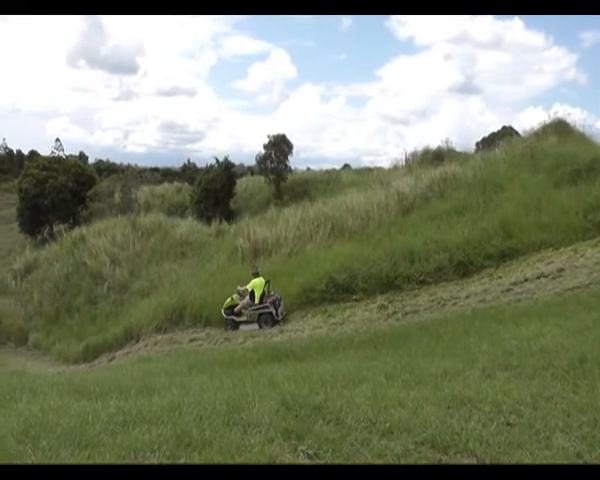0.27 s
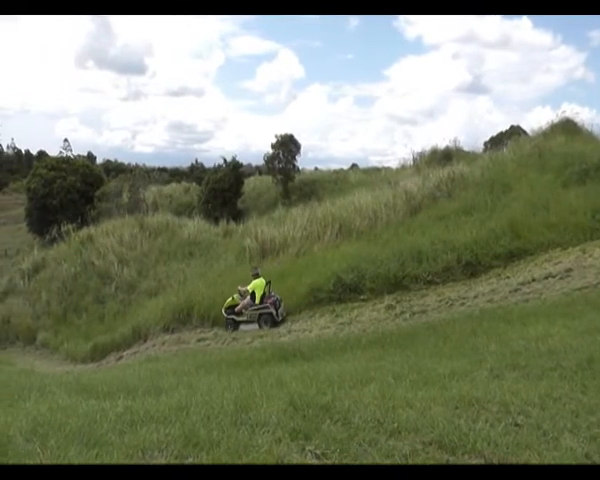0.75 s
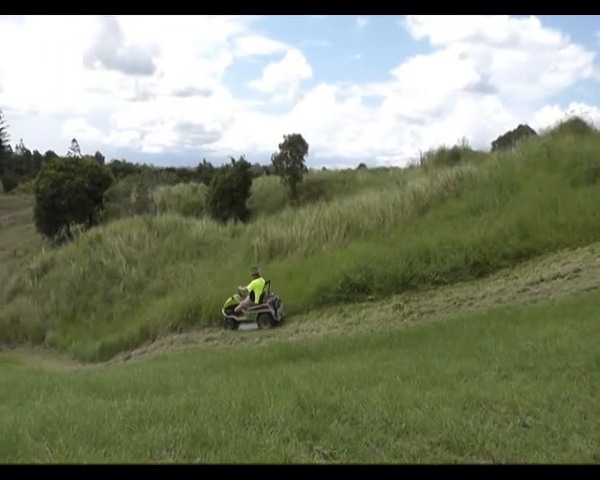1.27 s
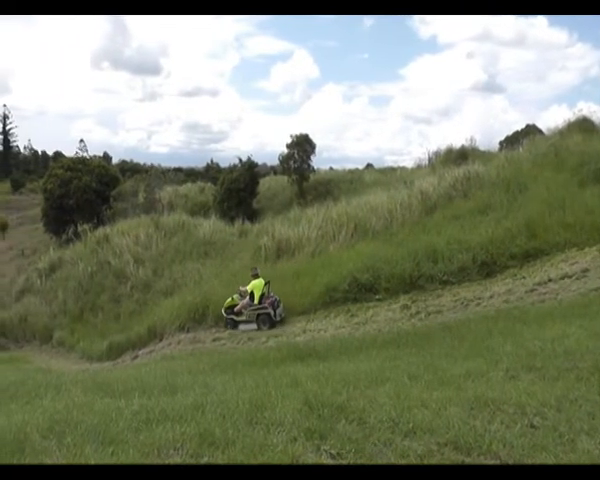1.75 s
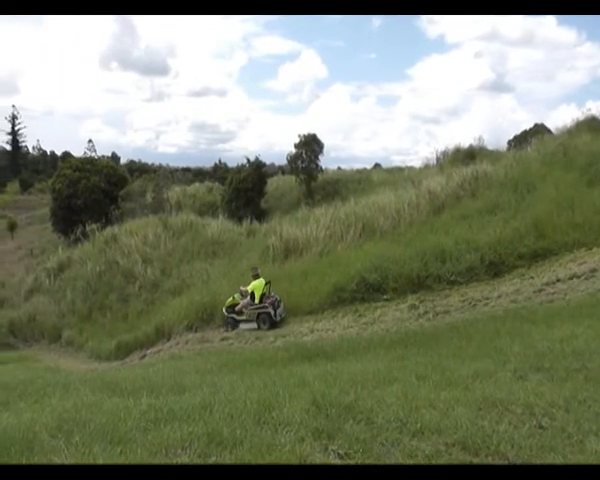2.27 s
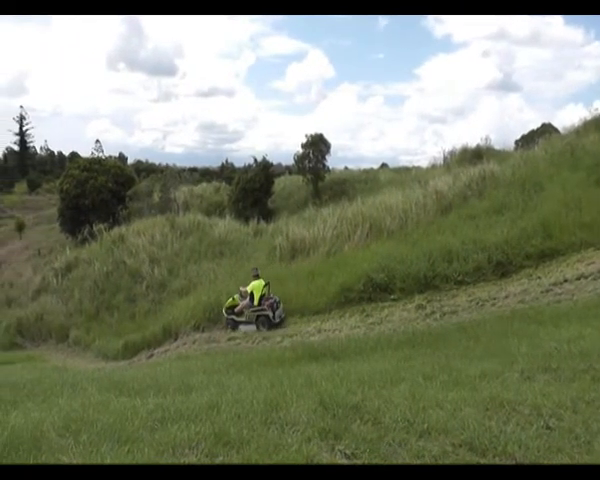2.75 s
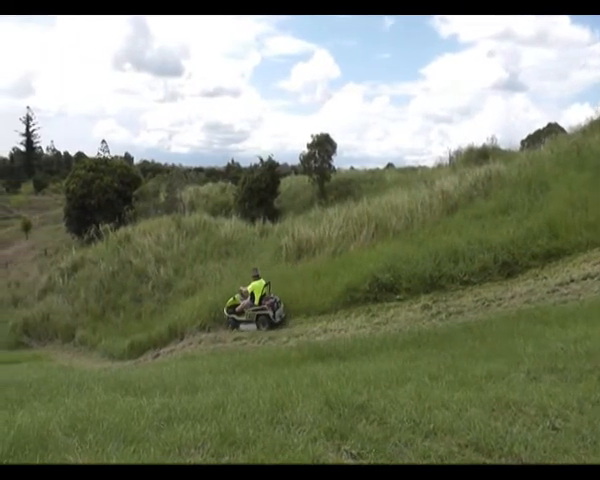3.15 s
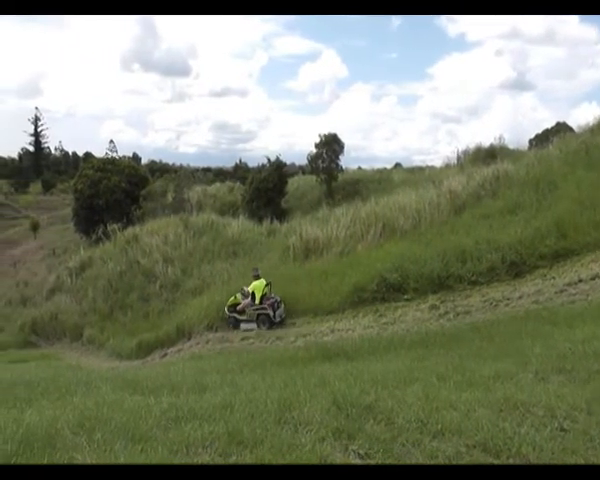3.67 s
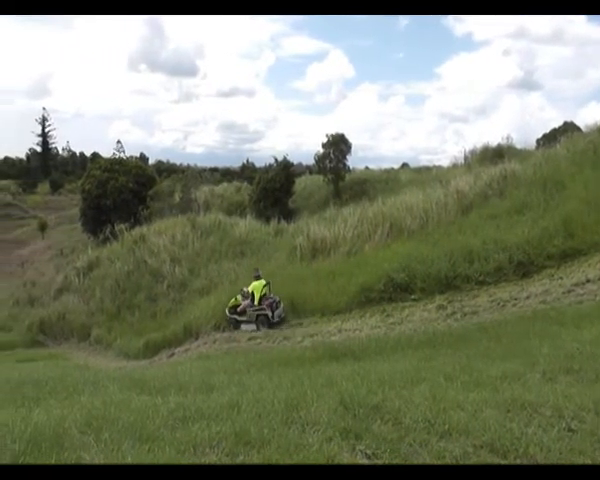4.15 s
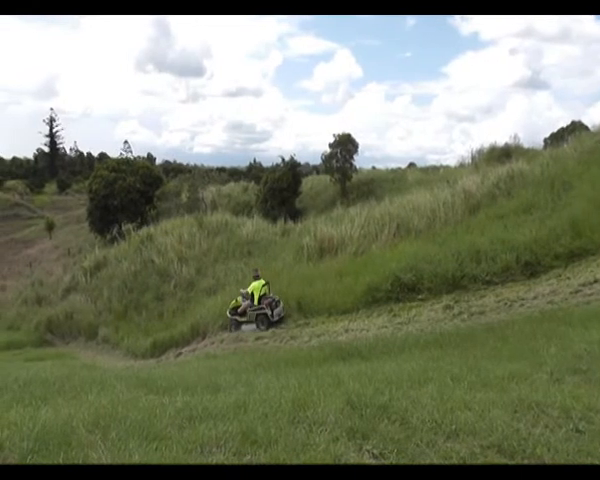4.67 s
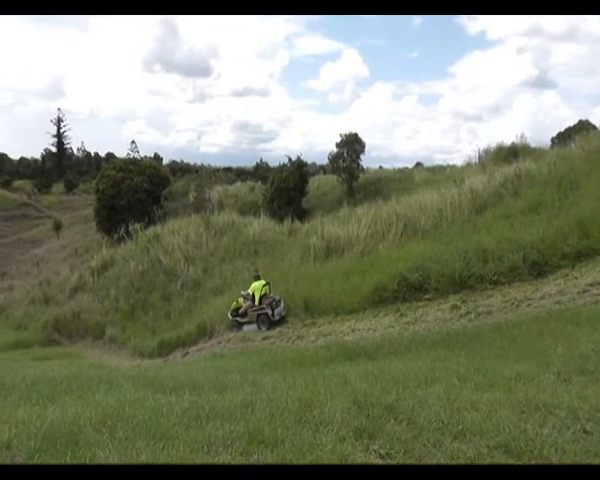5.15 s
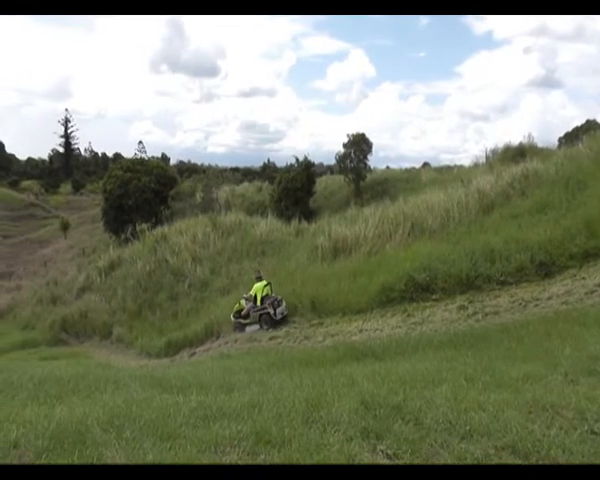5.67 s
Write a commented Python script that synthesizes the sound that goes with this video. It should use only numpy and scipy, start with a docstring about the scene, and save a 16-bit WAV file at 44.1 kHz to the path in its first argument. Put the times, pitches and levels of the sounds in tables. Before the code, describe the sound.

A ride-on mower's twin-cylinder petrol engine drones in the distance, its blades swishing through tall grass, bogging into a rougher bark near the end.

```python
"""A two-cylinder petrol engine drones from afar: a ride-on mower works through tall grass on an open hillside.
Sums of engine orders make the drone, and higher orders and pipe hiss the bark when thick grass bogs it down.
Orders of the blade passes thump in the deck, and throbbing noise is the slash of the grass at every pass.
Filtered noise makes the clatter, the roar and the breeze rumbling on the microphone; gusts and stalk
cracks come and go, and near the end a clump of grass surges through the deck."""
import sys
import numpy as np
from scipy import signal
from scipy.io import wavfile
from scipy.ndimage import uniform_filter1d

SR = 44100
rng = np.random.default_rng(int(sys.argv[2]) if len(sys.argv) > 2 else 0)


def store_wav(level_fs):
    """Save 16-bit WAV to argv[1]."""
    pcm = np.round(np.clip(np.atleast_2d(level_fs), -1, 1) * 32767)
    wavfile.write(sys.argv[1], SR, pcm.T.astype(np.int16))


def volts(x):
    """Linear amplitude factor 10**(x/20) for a level x in dB, scalar or array-like."""
    e = np.asarray(x, float) / 20
    return 10 ** e


N = 261072  # samples

FIRST_PASS = .46        # blade's place in its cycle of passing, in parts of that cycle
SECOND_CYLINDER = .375  # second firing after the first, in parts of a firing cycle
LEFT_RIGHT = np.array([[1], [-1]])


def rms_one(x):
    """Scale to unit rms."""
    return x / np.sqrt(np.mean(x ** 2) + 1e-20)


def in_time(rows):
    """Draw the columns of a table as curves over the samples."""
    seconds, *columns = np.transpose(rows)
    return [np.interp(np.arange(N) / SR, seconds, column) for column in columns]


def at_hz(points, hz):
    """Read a spectrum on a log-frequency axis."""
    point_hz, value = np.array(points).T[:2]
    return np.interp(np.log(hz), np.log(np.maximum(point_hz, 1)), value)


def drift(rate_hz):
    """Slow chance of spread 1: coarse noise through a double one-pole low-pass."""
    coarse = 40  # samples per coarse step
    pole = np.exp(-2 * np.pi * coarse * rate_hz / SR)
    noise = rng.standard_normal(N // coarse + 2002)
    slow = signal.lfilter([1], [1, -2 * pole, pole * pole], noise)[2000:]  # settled part only
    return np.interp(np.arange(N) / coarse, np.arange(len(slow)), rms_one(slow))


def turns(per_s):
    """Cycles completed since the start: the running sum of the rate."""
    return np.cumsum(per_s) / SR


def hiss_pairs():
    """White noise for bands(): two pairs, each a mid and a side signal."""
    return rng.standard_normal((2, 2, N))


# Stereo width over the spectrum. Each row: frequency in Hz, left-right likeness (1 = the same).
LIKENESS = [(60, 0.4), (110, 0.97), (200, 0.77), (370, 0.9), (690, 0.83), (1270, 0.96), (2330, 0.88),
            (4280, 0.88), (7880, 0.93), (14500, 0.65)]
# Stereo tilt over the spectrum. Each row: frequency in Hz, left minus right in dB.
LEFT_LEAD = [(60, -1), (700, 0.7), (1200, 3), (2300, 0), (4300, 0.5), (8000, 0), (14000, 6.5)]


def bands(spectrum, source, patchy_db, alike=1.0, flicker_hz=14.0):
    """Third-octave bands of noise, each with its own level, flicker and stereo likeness; rms 1 overall."""
    low_hz, high_hz = spectrum[0][0], spectrum[-1][0]
    edges = np.geomspace(low_hz, high_hz, int(3 * np.log2(high_hz / low_hz)) + 1)
    out = 0
    for k, (low, high) in enumerate(zip(edges, edges[1:])):
        sos = signal.butter(2, [low, high], "band", fs=SR, output="sos")
        mid, side = signal.sosfilt(sos, source[k % 2])  # neighbouring bands use different noise
        hz = np.sqrt(low * high)
        likeness = np.clip(alike * at_hz(LIKENESS, hz), 0, 1)
        level_db = at_hz(spectrum, hz) + patchy_db * drift(flicker_hz)
        gain = volts(level_db + at_hz(LEFT_LEAD, hz) / 2 * LEFT_RIGHT)
        out = out + gain * (np.sqrt(1 + likeness) * mid + np.sqrt(1 - likeness) * side * LEFT_RIGHT)
    return rms_one(out)


def order(phase, wobble_db, jitter, rate_hz=2.1):
    """One order of a rotation (phase in turns), wavering in level and phase as the air path shimmers."""
    level = np.sqrt(2) * volts(wobble_db * drift(rate_hz))
    return level * np.cos(2 * np.pi * phase + jitter * drift(4.6))  # jitter in radians


def puffs(phase, fall):
    """Two unevenly spaced gas puffs a cycle, each dying away; fall in parts of a cycle."""
    return sum(np.exp(-((phase - start) % 1) / fall) for start in (-.04, SECOND_CYLINDER - .06))


def burst(phase, rise, spread):
    """A swell each cycle, quick up and slower down, every cycle with its own strength."""
    part, count = phase % 1, np.floor(phase).astype(int) + 1
    swell = -np.cos(2 * np.pi * np.interp(part, [0, rise, 1], [0, .5, 1]))
    swell = swell - 2.0 * np.maximum(-swell, 0) ** 2  # the gaps run deeper than the crests run high
    strength = rng.standard_normal(count.max() + 1)[count]
    return swell + spread * uniform_filter1d(strength, size=120)


# The engine's speed. Each row: time in seconds, firing cycles per second.
ENGINE = [(0.0, 27.02), (0.4, 26.95), (1.0, 27.21), (1.6, 27.57), (2.2, 27.17), (2.7, 26.87), (3.2, 27.07),
          (3.65, 26.6), (4.1, 26.98), (4.55, 26.0), (4.85, 25.93), (5.1, 24.5), (5.3, 25.43), (5.55, 26.98),
          (5.75, 25.76), (5.92, 24.81)]
# The belt drive, slipping in thick grass. Each row: time in seconds, blade passes per firing cycle.
BELT = [(0.0, 1.8235), (0.6, 1.8401), (4.05, 1.8405), (4.8, 1.7956), (5.92, 1.8243)]


def engine_and_blade():
    """Phases in turns: the engine's firing cycle, and the blade passes that the belt drives from it."""
    cycles_per_s, = in_time(ENGINE)
    passes_per_cycle, = in_time(BELT)
    return turns(cycles_per_s), turns(cycles_per_s * passes_per_cycle)


# Exhaust orders. Each row: multiple of the firing cycle, level within the drone in dB,
# level within the bark in dB.
EXHAUST = [(2, -20, -22), (3, -15.5, -25), (4, -25, -23), (5, -1, -34), (6, -2, -3.5), (7, -11.5, -10),
           (8, -8, 0.5), (9, -12, -13), (10, -18, 4), (11, -24, -4.5), (13, -18, -14.5), (16, -19.5, -25),
           (20, -15, -16.5)]


def exhaust(phase, drone_db, bark_db):
    """Two uneven firings a cycle: the muffler passes a low drone, under load higher orders break through."""
    out = 0
    for k, drone, bark in EXHAUST:
        both_cylinders = 1 + np.exp(-2j * np.pi * k * SECOND_CYLINDER)
        twin = np.angle(both_cylinders) / (2 * np.pi)  # phase of their sum, in turns
        drone_phase = k * (phase - .02) + twin - .12
        bark_phase = k * (phase + SECOND_CYLINDER) + twin + .4
        out = out + volts(drone_db + drone) * order(drone_phase, wobble_db=1.2, jitter=.2)
        out = out + volts(bark_db + bark) * order(bark_phase, wobble_db=2.2, jitter=.2, rate_hz=3)
    return out


# Deck thump orders. Each row: multiple of the blade pass rate, level within the thump in dB.
THUMP = [(2, -15), (3, -1.5), (4, 2), (5, -2.5), (6, -9.5), (7, -8), (8, -10.5), (10, -15.5)]


def deck(phase, thump_db):
    """Each blade pass pumps air and grass through the housing as one soft thump."""
    place = phase - FIRST_PASS - .26
    return volts(thump_db) * sum(volts(db) * order(k * place, wobble_db=2.5, jitter=0.86) for k, db in THUMP)


# The cut over time. Each row: time in seconds, grass slash level in dB, depth of the throb at each
# pass in dB for a swing of 1.
CUT = [(0.0, -29.5, 4), (0.33, -30, 1.5), (0.55, -33.5, 1.5), (1.5, -30, 3), (2.3, -31.5, 3.5),
       (2.6, -28.5, 1), (3.25, -31.5, 5), (3.7, -29.5, 4.5), (4.0, -32, 5.5), (4.2, -30.5, 0),
       (4.85, -30.5, 4), (5.36, -37, 1.5), (5.77, -30.5, 1.5), (5.92, -38.5, 3)]
# Colour of the slash. Each row: frequency in Hz, relative level in dB per Hz.
SLASH = [(1760, -16), (3000, -6), (3970, -10), (4210, -8.5), (5100, -4.5), (6880, -8), (7570, 0),
         (10200, -4), (11800, -7), (13800, -10)]


def slash(phase):
    """A swish of hiss and stalk snaps at every pass of the blade, throbbing with the cut."""
    level_db, depth_db = in_time(CUT)
    throb = volts(depth_db * burst(phase - FIRST_PASS + .05 * drift(25), rise=.33, spread=.22))
    throb = throb / np.sqrt(uniform_filter1d(throb ** 2, size=8820))  # even level over 0.2 s
    unevenness = np.minimum(rng.exponential(1, (2, 1, N)), 6)  # stalks break unevenly
    snaps = volts(2.8 * unevenness + 2.0 * drift(150))
    return volts(level_db) * bands(SLASH, hiss_pairs() * throb * snaps, patchy_db=1.5, flicker_hz=40.0)


# Colour of the clatter. Each row: frequency in Hz, relative level in dB per Hz.
CLATTER = [(380, -37), (650, -5), (687, -35), (776, -24), (1030, -11), (1190, -7), (1290, -1), (1420, -7.5),
           (2300, -8), (3630, -8), (6000, -18), (7800, -29), (13200, -120)]
# Whine of fan and gears. Each row: multiple of the firing cycle, level against the clatter in dB.
WHINE = [(36, -24), (39, -23), (40, -20), (42, -24), (43, -20), (44, -19), (45, -22)]


def clatter(phase, level_db):
    """Valves, belt and cooling fan: noise swelling a little at each firing, with a faint high-order whine."""
    beat = (1 + .5 * puffs(phase, fall=0.18)) * volts(1.0 * drift(28))
    whine = sum(volts(db) * order(k * phase + rng.random(), wobble_db=2.5, jitter=.3) for k, db in WHINE)
    return volts(level_db) * (bands(CLATTER, hiss_pairs() * beat, patchy_db=0.79) + whine)


# Colour of the hiss at the pipe. Each row: frequency in Hz, relative level in dB per Hz.
PIPE_HISS = [(1200, -21), (1800, -10), (2700, 9), (3800, -16), (5500, 3.5), (7000, 0), (10000, -1),
             (13800, -6)]


def tailpipe(phase, bark_db):
    """Gas hisses out of the pipe at each firing, harder as the engine barks."""
    gas = uniform_filter1d(puffs(phase, fall=0.2), size=60) * volts(2.0 * drift(36))
    return volts(1.21 * bark_db + 0.5) * bands(PIPE_HISS, hiss_pairs() * gas, patchy_db=1.5)


# Colour of the low roar. Each row: frequency in Hz, relative level in dB per Hz.
ROAR = [(90, -5), (130, -32), (180, 11), (260, 1.5), (340, -1.5), (550, 3), (700, -13), (900, -5.5)]


def roar(phase, clatter_db, thump_db, drone_db):
    """Low noise that heaves with the firings and follows part of the swing of clatter, thump and drone."""
    level_db = -31.5
    for curve_db, share in ((clatter_db, .3), (thump_db, .33), (drone_db, .23)):
        level_db = level_db + share * (curve_db - curve_db.mean())
    swell = 1 + 0.82 * puffs(phase - .06, fall=0.082)
    return volts(level_db) * bands(ROAR, hiss_pairs() * swell, patchy_db=1.5, alike=1.0)


# Colour of the wind rumble. Each row: frequency in Hz, relative level in dB per Hz.
BREEZE = [(30, -21), (42, -14), (60, -12), (90, -3.5), (130, -1), (200, -7.5)]
# Short gusts. Each row: time of the crest in seconds, level added at the crest in dB.
GUSTS = [(0.64, -33), (1.38, -25), (1.52, -27), (2.25, -35), (5.47, -37)]


def breeze():
    """Wind on each microphone port: a dying rumble with a few short gusts."""
    start_db, dies_db_per_s, gust_s = -31.5, 1.5, .04
    t = np.arange(N) / SR
    level = volts(start_db - dies_db_per_s * t)
    level = level + sum(volts(db) * np.exp(-.5 * ((t - s) / gust_s) ** 2) for s, db in GUSTS)
    return level * bands(BREEZE, hiss_pairs(), patchy_db=2.5, alike=0.43, flicker_hz=7.6)


# Snapping stalks. Each row: time in seconds, level in dB ahead of the band-pass.
STALKS = [(0.8217, -10), (1.8325, -9), (2.3097, -8.5), (3.22, -13), (3.7045, -8), (3.767, -12),
          (3.8923, -11), (4.031, -12), (4.8985, -7), (5.7853, -11)]


def stalks():
    """Thick stalks snap: bright crackle of random sign, dying away within about a millisecond."""
    hits = np.zeros(N)
    hits[[round(s * SR) for s, db in STALKS]] = volts(np.array(STALKS)[:, 1])
    decay = np.exp(-1 / (.0007 * SR))  # 0.7 ms
    crack = signal.lfilter([1], [1, -decay], hits + 1e-18) * rng.choice([-1, 1], N)
    return signal.sosfilt(signal.butter(2, [5000, 13000], "band", fs=SR, output="sos"), crack)


# The clump of grass. One row: time of the crest in seconds, level in dB, spread in seconds.
CLUMP = (5.785, -27, .022)


def clump():
    """A clump of grass is dragged through the deck: a rough broad surge of noise."""
    crest_s, level_db, spread_s = CLUMP
    swell = np.exp(-.5 * ((np.arange(N) / SR - crest_s) / spread_s) ** 2)
    swell = swell * volts(3.2 * drift(52))
    sos = signal.butter(2, [300, 3500], "band", fs=SR, output="sos")
    return volts(level_db) * swell * rms_one(signal.sosfilt(sos, rng.standard_normal(N)))


# The load on engine and blade. Each row: time in seconds, exhaust bark in dB, deck thump in dB.
LOAD = [(0.0, -49, -43), (0.2, -42, -36), (0.4, -41.5, -40.5), (0.62, -30.5, -25.5), (0.9, -48, -37),
        (1.1, -37, -34.5), (1.3, -43.5, -35), (1.75, -44.5, -39.5), (2.1, -38, -40), (2.4, -58, -33.5),
        (2.8, -33, -43), (3.3, -45.5, -42.5), (3.65, -43, -37.5), (3.9, -53.5, -47), (4.3, -42, -34.5),
        (4.8, -28.5, -26.5), (5.1, -25.5, -28), (5.45, -26.5, -38), (5.65, -29.5, -40),
        (5.78, -29.5, -25.5), (5.92, -26.5, -36)]
# How loud the machine arrives as the air over the slope shifts. Each row: time in seconds,
# clatter in dB, exhaust drone in dB.
MACHINE = [(0.0, -32, -28.5), (0.25, -32.5, -31), (0.62, -29.5, -25), (0.81, -28, -23), (0.9, -31.5, -28),
           (1.1, -29, -28.5), (1.4, -28.5, -26), (1.52, -27.5, -27), (1.62, -31.5, -30),
           (2.21, -30.5, -30.5), (2.47, -33.5, -32.5), (2.75, -29, -27), (3.18, -33.5, -29.5),
           (3.25, -37, -31.5), (3.6, -30.5, -26.5), (3.92, -39.5, -35), (4.35, -33, -29),
           (4.7, -32.5, -26.5), (4.9, -31, -30), (5.1, -32.5, -35), (5.7, -29.5, -25), (5.92, -30.5, -35)]


def scene():
    """Mower near the middle, creeping leftwards, with breeze on each microphone port."""
    firing, passing = engine_and_blade()
    bark_db, thump_db = in_time(LOAD)
    clatter_db, drone_db = in_time(MACHINE)
    tones = exhaust(firing, drone_db, bark_db) + deck(passing, thump_db)
    hiss = slash(passing) + clatter(firing, clatter_db) + tailpipe(firing, bark_db)
    low_roar = roar(firing, clatter_db, thump_db, drone_db)
    mower = tones + hiss + low_roar + stalks() + clump()
    creep_db = np.linspace(-.3, .3, N)  # left up, right down
    return mower * volts(creep_db * LEFT_RIGHT) + breeze()


def top_cut(x):
    """Nothing passes above the cut-off."""
    return signal.sosfilt(signal.butter(12, 15100, fs=SR, output="sos"), x)


def record(dry):
    """The microphone dips around 12 kHz, and the top is cut steeply above 13.78 kHz."""
    peak = signal.lfilter(*signal.iirpeak(12000, 14, fs=SR), dry)
    dipped = dry - .4 * peak
    cut = signal.sosfilt(signal.ellip(10, .5, 45, 13780, fs=SR, output="sos"), dipped)
    return top_cut(cut)


dry = scene()
out = record(dry)
store_wav(out)
```